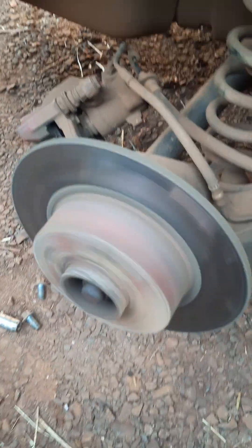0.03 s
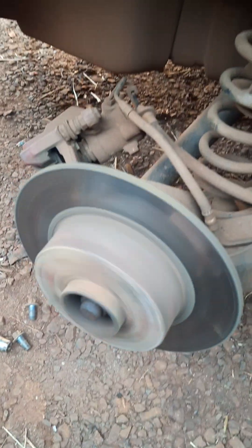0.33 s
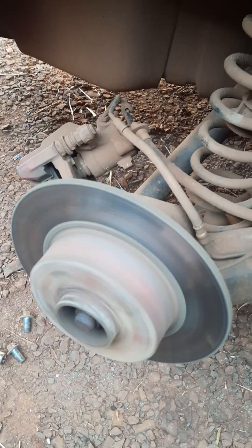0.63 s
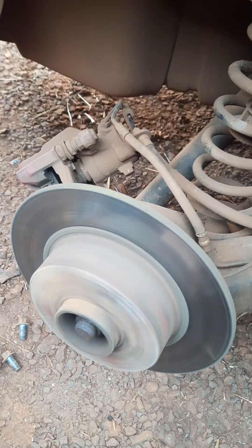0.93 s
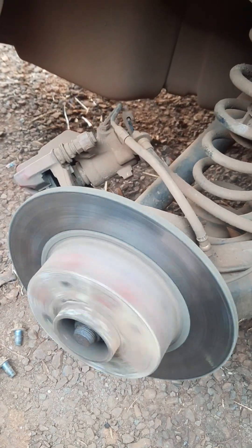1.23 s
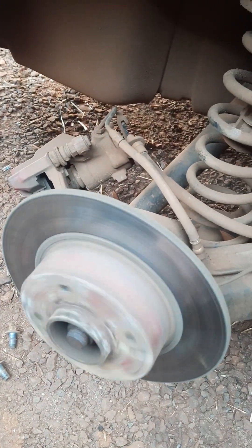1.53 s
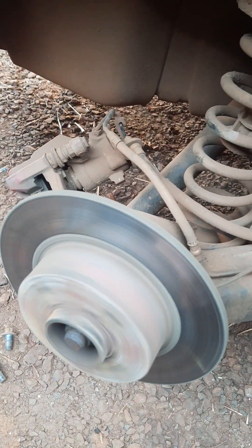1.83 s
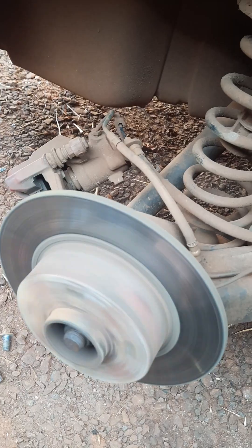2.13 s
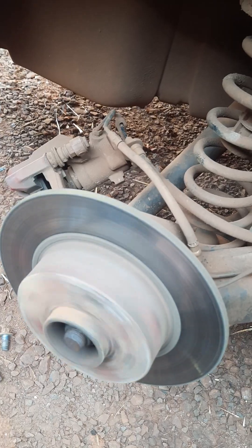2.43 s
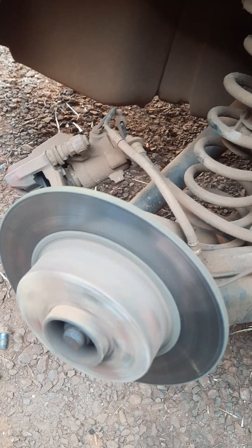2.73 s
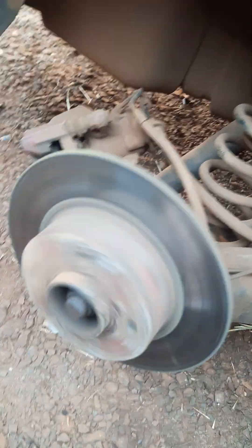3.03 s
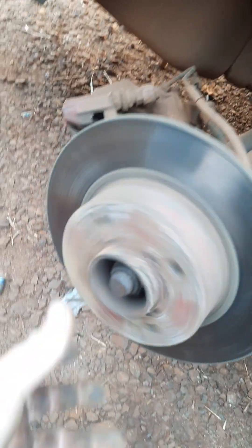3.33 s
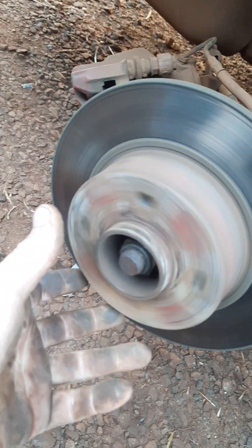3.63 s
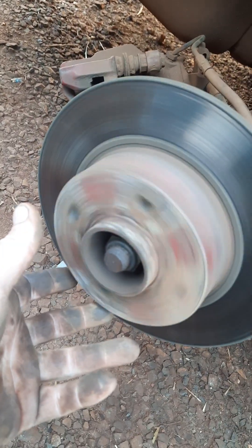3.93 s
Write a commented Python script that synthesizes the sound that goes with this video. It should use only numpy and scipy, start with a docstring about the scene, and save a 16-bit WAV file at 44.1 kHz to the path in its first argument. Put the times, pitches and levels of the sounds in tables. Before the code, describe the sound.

A spinning car wheel hub drones and growls on a worn bearing, with faint ticks.

```python
"""Outdoors, close to a hand-held microphone: a bare wheel hub and brake disc coast on a worn bearing.
Balls rumble over pitted races and ring the disc and suspension. The growl swells on rough patches
and dulls as the hub slows. Thumps, knocks, clacks, scraping ticks and grit ring the same parts;
nicks and light rubs sound single disc modes. One dry click, a breeze on the microphone, a thin hiss."""
import sys
import numpy as np
from scipy import signal
from scipy.fft import rfft, irfft, next_fast_len
from scipy.io import wavfile
from scipy.ndimage import map_coordinates

SR = 44100
rng = np.random.default_rng(int(sys.argv[2]) if len(sys.argv) > 2 else 0)


def transcribe(signal):
    """Save signal, clipped to [-1, 1], as a 16-bit WAV file at the path in sys.argv[1]."""
    frames = np.atleast_2d(signal).T
    limited = np.clip(frames, -1, 1)
    pcm = np.round(limited * 32767).astype(np.int16)
    wavfile.write(sys.argv[1], SR, pcm)


N = 176400
T = np.arange(N) / SR
FFT_SIZE = next_fast_len(N + SR // 2)
FREQS_HZ = np.maximum(np.arange(FFT_SIZE // 2 + 1) * SR / FFT_SIZE, 1)
NOISE_RMS = np.sqrt(SR / 2)  # white noise at 0 dB per Hz


def amp(db):
    """Decibels to gain."""
    return 10 ** (np.asarray(db) / 20)


def curve(rows):
    """Breakpoints interpolated over time."""
    return np.interp(T, *np.array(rows).T)


def spectrum(rows, column=1):
    """One table column interpolated over log frequency."""
    rows = np.array(rows)
    return np.interp(np.log(FREQS_HZ), np.log(rows[:, 0]), rows[:, column])


def stereo(db, pan_db):
    """Left and right gains; pan is left minus right."""
    return amp(db + np.array([[1], [-1]]) * pan_db / 2)


def colour(x, gain):
    """Filter by a gain per frequency."""
    return irfft(rfft(x, FFT_SIZE) * gain, FFT_SIZE)[..., :N]


def highpass(hz):
    """Gain of a steep high-pass."""
    return 1 / (1 + (hz / FREQS_HZ) ** 4)


def bandpass(low_hz, high_hz):
    """Gain of a steep band-pass."""
    return highpass(low_hz) * (1 - highpass(high_hz))


def causal(gain):
    """Minimum-phase response with this gain: rings only after a blow."""
    cepstrum = irfft(np.log(gain + 1e-12), FFT_SIZE)
    cepstrum[..., 1:FFT_SIZE // 2] *= 2
    cepstrum[..., FFT_SIZE // 2 + 1:] = 0
    return np.exp(rfft(cepstrum))


def noise():
    """Two independent white noises."""
    return rng.standard_normal((2, N)) * NOISE_RMS


def wander(per_s):
    """Smooth random signal, spread near 1."""
    return map_coordinates(rng.standard_normal(4096), [T * per_s], order=3, mode="wrap")


def burst(start_s, attack_s, decay_s):
    """Linear rise, exponential fall."""
    rise = np.clip((T - start_s) / attack_s, 0, 1)
    return rise * np.exp(-np.maximum(T - start_s - attack_s, 0) / decay_s)


def resonances(modes):
    """Left and right power response of a set of modes."""
    power = 0
    for hz, width_hz, db, pan_db in modes:
        detune = (FREQS_HZ / hz - hz / FREQS_HZ) * hz / (width_hz * np.pi / 2)
        power = power + (stereo(db, pan_db) / (1 + detune ** 2)) ** 2
    return power


# Likeness of the two microphone ports. Each row: frequency in Hz, correlation 0-1.
PORT_CORRELATION = [(50, 0.2), (140, 0.98), (330, 0.9), (640, 0.66), (1400, 0.36), (3000, 0.35),
                    (12000, 0.19)]
# Each row: frequency in Hz, phase lead of the left port in radians.
PORT_LEAD_RAD = [(100, -0.6), (330, 0.36), (560, 0.4), (650, -1.14), (790, 0.8), (950, 0), (1060, -2.5),
                 (1280, 0), (1500, -4), (2000, -0.5), (4000, -1)]


def radiate(force, power):
    """A part rings with the force and reaches the two ports unevenly."""
    gain = np.sqrt(power)
    mean_gain = gain.mean(axis=0)
    correlation = np.clip(spectrum(PORT_CORRELATION), 0, 1)
    shared = colour(force[0], correlation * np.exp(-1j * spectrum(PORT_LEAD_RAD)))
    right = shared + colour(force[1], np.sqrt(1 - correlation ** 2))
    return colour(np.array([force[0], right]), causal(mean_gain) * gain / mean_gain)


# Breeze. Each row: frequency in Hz, level in dB per Hz.
WIND_SPECTRUM = [(20, -78.5), (35, -62.5), (60, -40.5), (90, -45), (130, -48.5), (220, -65), (500, -100),
                 (3000, -160)]
# Each row: time in seconds, breeze gain in dB.
GUST_DB = [(0, -16.5), (.55, -9.5), (1.1, -25), (1.65, -16), (1.95, -8), (2.18, -10), (2.3, 2),
           (2.55, -3.5), (2.62, -8), (2.68, 1), (2.78, 4.5), (2.81, -2), (2.835, 4.5), (2.875, -3),
           (2.97, -5.5), (3.2, -8.5), (3.3, -32), (4, -13)]
# Outdoor hiss. Each row: frequency in Hz, level in dB per Hz, pan in dB.
HISS_SPECTRUM = [(1000, -78.5, -7), (2930, -89.5, -2.5), (4500, -95.5, -11.5), (6150, -93, -17),
                 (7170, -100, -16), (8200, -104, -11), (9400, -116, -2.5), (9700, -113, 7),
                 (11340, -103, -2), (13500, -101.5, -11), (15600, -104, -5)]
# Each row: time in seconds, hiss gain in dB.
HISS_DB = [(0, -0.5), (1.2, -2.5), (2.1, -1), (2.7, 1), (3.15, 1), (3.5, 0), (4, -1.5)]


def outdoors():
    """Gusts rumble on each port separately, under a thin hiss."""
    wind = colour(noise(), amp(spectrum(WIND_SPECTRUM)))
    hiss = colour(noise(), stereo(spectrum(HISS_SPECTRUM), spectrum(HISS_SPECTRUM, column=2)))
    return wind * amp(curve(GUST_DB)) + hiss * amp(curve(HISS_DB))


# Tone of the click. Each row: frequency in Hz, gain in dB.
CLICK_SPECTRUM = [(900, -27), (1500, -9), (2000, 0.5), (3000, -0.5), (4500, -11), (6500, -29), (10000, -57)]


def click(start_s=3.197, snap_db=12):
    """One dry click on the right: a sharp impulse and a tiny crumbling tail."""
    force = 0.5 * noise() * burst(start_s, attack_s=1 / SR, decay_s=0.0008)
    force[:, int(start_s * SR)] += NOISE_RMS * amp(snap_db)
    return colour(force, causal(amp(spectrum(CLICK_SPECTRUM)))) * stereo(-55.5, pan_db=-13.5)


# Disc pings. Each row: start in seconds, level in dB.
DISC_PINGS = [(.628, -52), (1.156, -55), (1.32, -51)]


def pings(hz=7720, wobble_rad=0.7):
    """A high disc mode is nicked and rings briefly, a little roughly."""
    envelope = sum(amp(db) * burst(start_s, attack_s=0.005, decay_s=0.0098) for start_s, db in DISC_PINGS)
    phase = 2 * np.pi * hz * T + wobble_rad * wander(per_s=680)
    return envelope * np.sin(phase) * stereo(0, pan_db=-14)


# Rubs on the disc. Each row: start in seconds, hold in seconds, mode frequency in Hz, width in Hz,
# level in dB per Hz, pan in dB.
DISC_RUBS = [(1.128, 0.11, 1397, 8.1, -49.5, 6), (2.258, 0.45, 1397, 6.1, -54.5, 0),
             (2.952, 0.22, 1765, 14, -57.5, 0)]


def singing(attack_s=0.04, release_s=0.17):
    """Light rubs hold single disc modes ringing, then let go."""
    out = 0
    for start_s, hold_s, *mode in DISC_RUBS:
        corners_s = start_s + np.cumsum([0, attack_s, hold_s, release_s])
        envelope = np.interp(T, corners_s, [0, 1, 1, 0])
        out = out + radiate(noise() * envelope, resonances([mode]))
    return out


SCRAPE_HZ, SIZZLE_HZ = 4130, 11000  # lower band edges


def grit(per_s=26, spread_db=7, fade_db_per_s=1.5, decay_s=0.0036):
    """Fine random crackle in the bearing, dying away as the hub slows."""
    hits = rng.random(N) < per_s / SR
    grains = hits * amp(-5 + spread_db * rng.standard_normal(N) - fade_db_per_s * T)
    envelope = signal.lfilter([1], [1, -np.exp(-1 / (decay_s * SR))], grains)
    return colour(noise() * envelope, highpass(SCRAPE_HZ) + highpass(SIZZLE_HZ))


# Scraping ticks. Each row: start in seconds, scrape in dB, sizzle in dB, both before their boosts.
SCRAPE_TICKS = [(.147, 10, 12), (.205, 6, 10), (.220, 6, 16), (.251, -13, 8), (.332, 3.5, 9), (.410, 0, 8),
                (.45, -5, 8), (0.510, 2, 11), (.567, -2.5, 6), (.603, 3, -2), (.712, 2.5, -5),
                (.793, 0, 16), (.840, 0.5, 14), (.887, 3.5, 7), (.947, -4, -7), (1.156, 2, -9),
                (1.322, 5.5, 0), (1.42, -3, 3), (1.484, 5, 13), (1.556, 0, 2), (1.75, 10.5, 6),
                (2.154, 4, -11), (2.44, 0, -5), (2.768, 1.5, -10), (2.85, 1, -10), (3.09, -1, -2),
                (3.303, 0, -9), (3.545, -3, 4), (3.608, 3, 0), (3.708, 2, -3)]


def ticks(grain_db=5.5, scrape_boost_db=7, sizzle_boost_db=7.5):
    """Brief bright scrapes of the spinning metal, some with a sizzle on top."""
    grain = amp(grain_db * wander(per_s=900))
    grain /= np.sqrt(np.mean(grain ** 2))
    scrape, sizzle = 0, 0
    for start_s, scrape_db, sizzle_db in SCRAPE_TICKS:
        envelope = burst(start_s, attack_s=0.0035, decay_s=0.011) * grain
        scrape = scrape + amp(scrape_db + scrape_boost_db) * envelope
        sizzle = sizzle + amp(sizzle_db + sizzle_boost_db) * envelope
    return colour(noise() * scrape, highpass(SCRAPE_HZ)) + colour(noise() * sizzle, highpass(SIZZLE_HZ))


# Metal contacts. Each row: start in seconds, force level in dB, upper band edge in Hz.
METAL_CLACKS = [(0.336, 9.5, 3200), (.684, 12, 2000), (0.88, 20.5, 1800), (1.131, 11.5, 2600),
                (2.849, 5.5, 1990), (3.303, -0.5, 3400), (3.653, 8.5, 3000), (3.706, 5.5, 3800)]


def clacks(low_hz=1320):
    """Hard metal contacts chatter in the band where the disc rings."""
    chatter, force = noise(), 0
    for start_s, db, high_hz in METAL_CLACKS:
        envelope = amp(db) * burst(start_s, attack_s=0.0018, decay_s=0.012)
        force = force + colour(chatter * envelope, bandpass(low_hz, high_hz))
    return force


# Play in the bearing. Each row: start in seconds, force level of the rattle in dB.
PLAY_KNOCKS = [(.139, 9), (.474, 6), (.792, 8.5), (0.88, 9.5), (2.35, 4), (2.765, 3), (2.846, 5),
               (2.895, -3.5), (3.261, 3), (3.855, 0), (3.966, 4.5)]


def knocks(attack_s=0.00059, decay_s=0.007, snap_db=19.5):
    """The loose bearing takes up its play with one blow and a short dull rattle."""
    force = noise() * sum(amp(db) * burst(start_s, attack_s, decay_s) for start_s, db in PLAY_KNOCKS)
    for start_s, db in PLAY_KNOCKS:
        force[:, int(start_s * SR)] += NOISE_RMS * amp(db + snap_db)
    return colour(force, causal(bandpass(low_hz=380, high_hz=1720)))


# Low bumps. Each row: start in seconds, force level in dB.
LOW_THUMPS = [(0.159, 7), (.285, 6), (0.47, 9.5), (1.789, 9), (1.895, 3), (2.758, 13), (3.599, 7),
              (3.719, 6.5), (3.826, 11)]


def thumps(attack_s=0.0037, decay_s=0.009):
    """Soft heavy bumps that shake the carrier more than the disc."""
    envelope = sum(amp(db) * burst(start_s, attack_s, decay_s) for start_s, db in LOW_THUMPS)
    return colour(noise() * envelope, causal(bandpass(low_hz=137, high_hz=500)))


# Bands of the rolling force. Each row: frequency in Hz, initial gain in dB, fade in dB per second,
# share of the patch swell, flutter in dB.
ROLL_BANDS = [(157, -0.5, 0.25, 0.067, -0.5), (360, 1.83, 0.88, 0.21, 0.5), (750, 1.46, 2.14, 0.51, 1.6),
              (1310, 2.5, 3, 0.95, -0.54), (1800, 0.37, 2.5, 0.95, 1.5), (3400, 1.06, 2.5, 0.4, 1.1),
              (6000, -0.2, 1.8, 0.2, 1.6)]
# Rough patches in the races. Each row: centre in seconds, length in seconds, full swell in dB.
ROUGH_PATCHES = [(0.214, 0.058, 6.5), (0.23, 0.021, 3.5), (0.346, 0.04, 2.5), (0.51, 0.1, 3.5),
                 (0.667, 0.094, 5), (0.84, 0.015, 7), (0.895, 0.013, 2), (0.93, 0.023, 5.5),
                 (1.143, 0.024, 8.5), (1.353, 0.055, 1.5), (1.506, .025, 0.5), (1.561, 0.026, 7.5),
                 (1.761, 0.057, 3), (2.034, 0.037, 5), (2.145, 0.02, 1.5), (2.776, 0.0067, -3),
                 (2.863, 0.034, 5), (2.996, 0.039, 7), (3.07, 0.035, 6), (3.614, 0.016, 8.5),
                 (3.66, 0.011, 10), (3.712, 0.022, 9.5), (3.752, 0.019, 7), (3.865, 0.016, 5)]
# The microphone swings away from the disc's rim. Each row: time in seconds, treble gain in dB.
TREBLE_DB = [(0, 3), (.12, 1), (1.2, 1.3), (2.2, 1.5), (3.1, -1.5), (3.4, -0.5), (4, 0)]
# Each row: time in seconds, gain of the low hum in dB.
HUM_DB = [(0, -3.5), (.2, 1), (.62, -1), (.84, 3), (1.04, 1), (1.55, 1.5), (1.68, -3), (1.81, -0.5),
          (2.15, -3), (2.5, 2), (2.95, 0.5), (3.05, -5.5), (3.3, 1.5), (3.5, -4), (3.7, -0.5), (4, -0.5)]
# Each row: time in seconds, overall rolling gain in dB.
ROLL_DB = [(0, 1), (.12, -1.5), (.17, 0.5), (.5, 0), (2.2, 0.03), (3.1, 0), (3.42, 1.5), (3.6, 1.6),
           (4, 0.5)]


def rolling(impacts_per_s=4200, spread_db=3, hum_below_hz=250, treble_above_hz=1200):
    """Dense impacts of balls on pits flutter, swell on rough patches and fade as the hub slows."""
    hits = (rng.random(N) < impacts_per_s / SR) * amp(spread_db * rng.standard_normal(N))
    impacts = np.sign(noise()) * hits / np.sqrt(np.mean(hits ** 2)) * NOISE_RMS
    swell_db = sum(db * np.exp(-2 * ((T - centre_s) / length_s) ** 2)
                   for centre_s, length_s, db in ROUGH_PATCHES)
    flutter, force = wander(per_s=42), 0
    for hz, initial_db, fade_db_per_s, share, flutter_db in ROLL_BANDS:
        band = spectrum([(row[0], row[0] == hz) for row in ROLL_BANDS])  # crossfades into its neighbours
        db = initial_db - fade_db_per_s * T + share * swell_db + flutter_db * flutter
        db += (hz > treble_above_hz) * curve(TREBLE_DB) + (hz < hum_below_hz) * curve(HUM_DB)
        force = force + colour(impacts, band) * amp(db)
    return force * amp(curve(ROLL_DB))


# Carrier and suspension modes. Each row: frequency in Hz, width in Hz, gain in dB, pan in dB.
CARRIER_MODES = [(162.3, 22.4, -44, 3.5), (231.6, 6.9, -54.5, 11.5), (325.1, 10.3, -42, -7.5),
                 (392.6, 24, -56, -12.5), (546.5, 8.6, -50, 16), (645.3, 26, -49.5, 4.5),
                 (790, 45, -50.5, 6.5), (882, 24, -58.5, 10.5), (952.4, 33, -57, -15.5),
                 (1031, 73, -62.5, -14.5), (1140, 40, -61.5, 8.5)]
# Broad response between the modes. Each row: frequency in Hz, gain in dB, pan in dB.
CARRIER_BODY = [(25, -71, -2.5), (42.3, -73.5, -6.5), (63, -55, 10.5), (111, -57.5, -6.5), (287, -50, 5),
                (490, -55.5, 6), (750, -55.5, -6), (1096, -65, 14.5), (1450, -70.5, 0.5),
                (2136, -75.5, -0.5), (2820, -82, -9), (3450, -87.5, 5.5), (4600, -99.5, -4),
                (6140, -99, -18.5), (7300, -102, -13), (8520, -104, -12.5), (9600, -123, -8),
                (10300, -122, -0.5), (11600, -108.5, 7.5), (15500, -115, -4)]
# Brake disc modes. Each row: frequency in Hz, width in Hz, gain in dB, pan in dB.
DISC_MODES = [(1275.4, 16.5, -59.5, 12), (1412, 16.7, -58, -3), (1510, 25, -77.5, -1.5),
              (1640, 12, -67, -8), (1751, 17.6, -60, 3), (1783, 11, -59.5, -5.5), (1825, 20, -63, 7),
              (1960, 6, -73.5, 1), (2077, 35, -80, -2.5), (2512, 40, -67, -6.5), (2597, 68, -73, -9.5),
              (3337, 50, -77.5, 1.5), (4015, 85, -83.5, -13.5), (5215, 180, -88.5, -16.5),
              (5630, 59, -84, -14), (5880, 100, -84.5, -19.5), (6460, 40, -88.5, -12),
              (7800, 45, -94.5, -14.5), (8220, 56, -99, -10)]
# The microphone moves past the rim. Each row: time in seconds, disc gain in dB.
DISC_DB = [(0, -2), (.6, 0), (1.2, -0.5), (1.8, -1.5), (2.7, -0.5), (3.03, 0.5), (3.25, 0), (3.4, -6.5),
           (4, -3.5)]


def hub(force):
    """The force sets the carrier and suspension droning; the disc rings above them."""
    body = stereo(spectrum(CARRIER_BODY), spectrum(CARRIER_BODY, column=2))
    drone = radiate(force, body ** 2 + resonances(CARRIER_MODES))
    ring = radiate(force[::-1], resonances(DISC_MODES))  # force channels swapped
    return drone + ring * amp(curve(DISC_DB))


def scene():
    """The coasting hub in the open air."""
    force = rolling() + thumps() + knocks() + clacks() + ticks() + grit()
    return hub(force) + pings() + click() + outdoors() + singing()


def record(dry):
    """Steep low-pass at 15750 Hz."""
    return signal.sosfilt(signal.ellip(10, 0.1, 80, 15750, fs=SR, output="sos"), dry)


dry = scene()
out = record(dry)
transcribe(out)
```